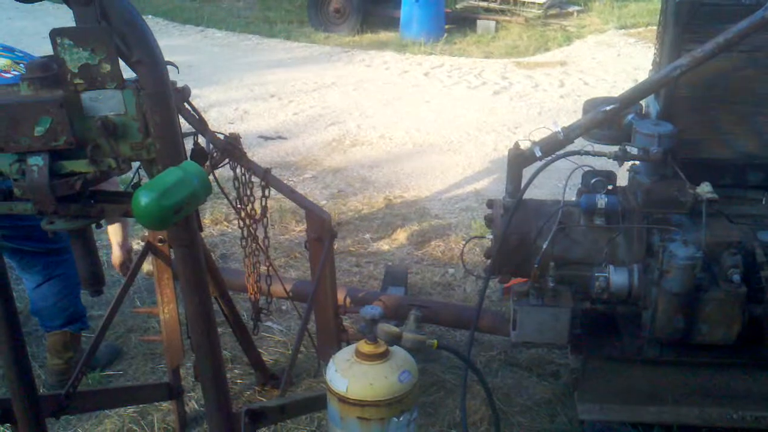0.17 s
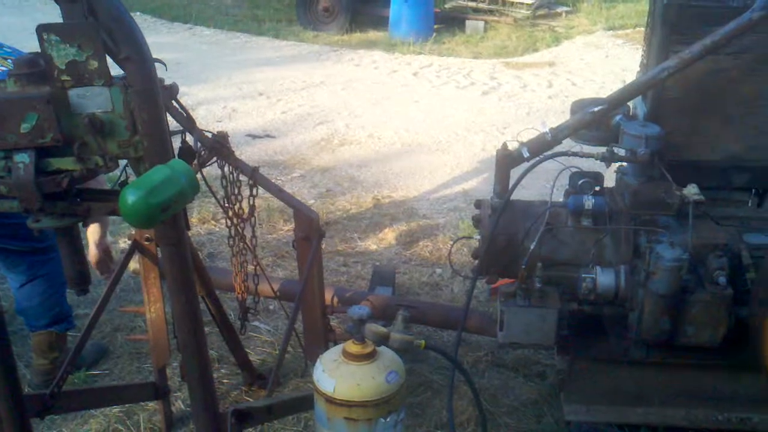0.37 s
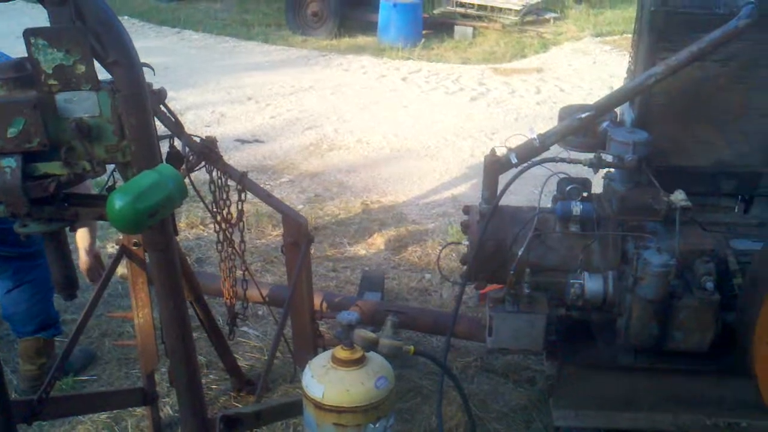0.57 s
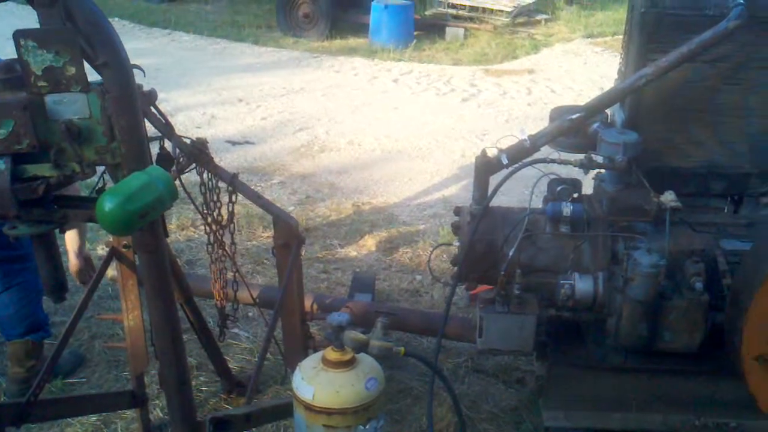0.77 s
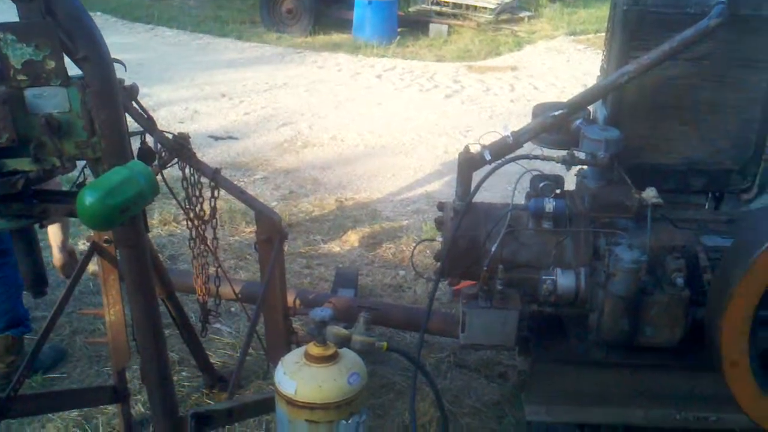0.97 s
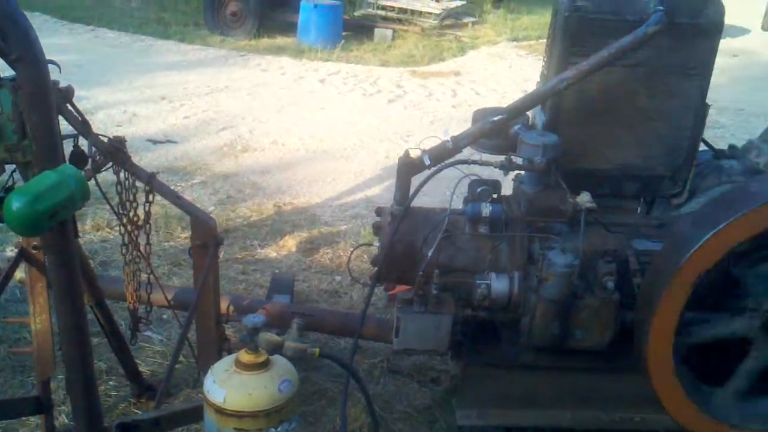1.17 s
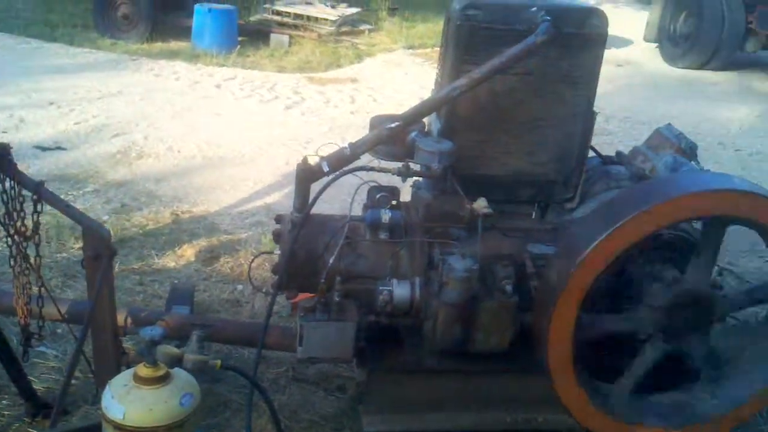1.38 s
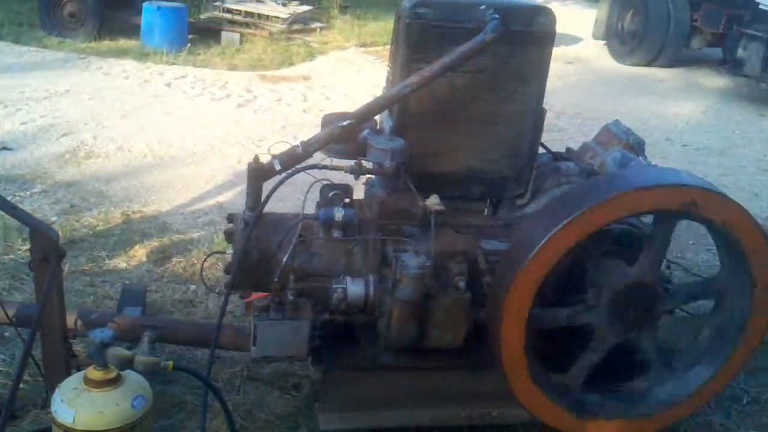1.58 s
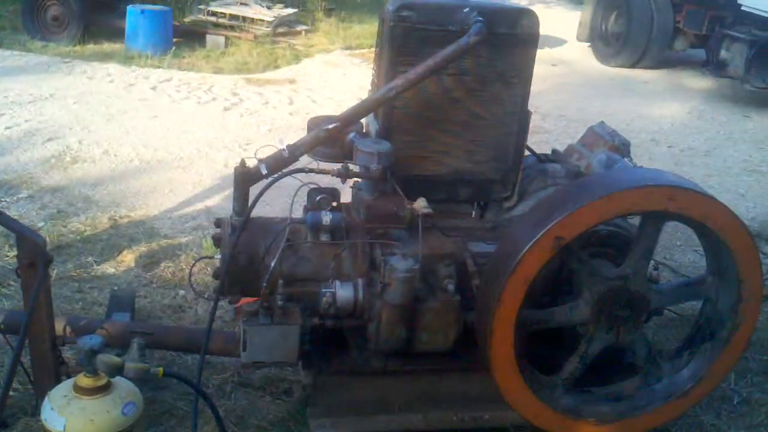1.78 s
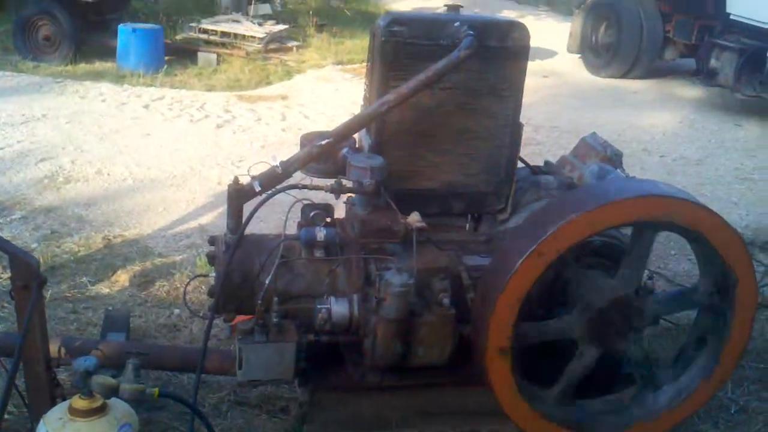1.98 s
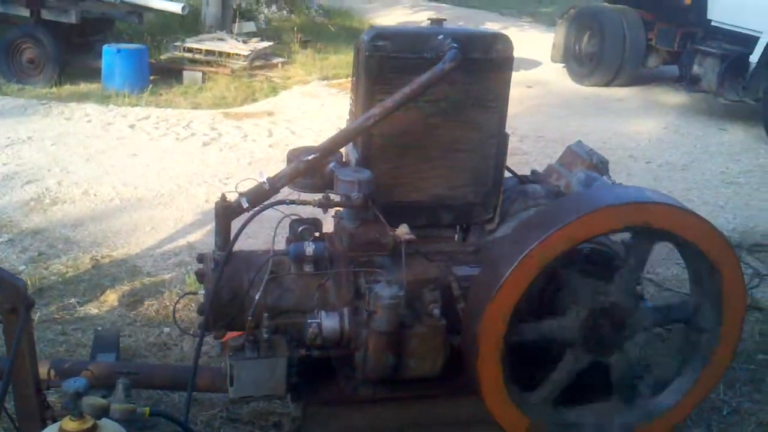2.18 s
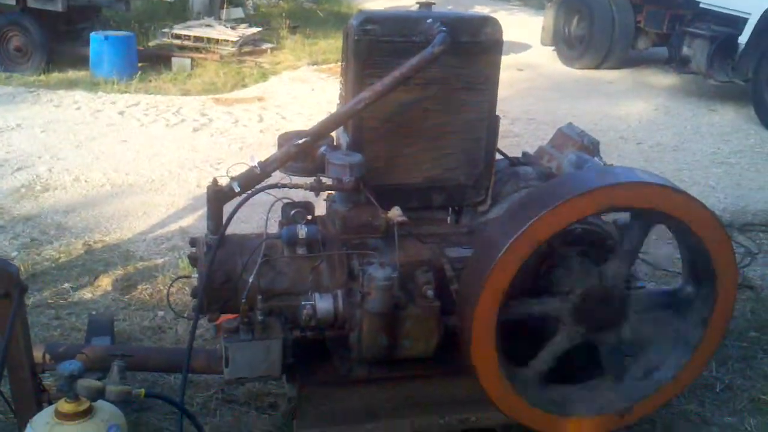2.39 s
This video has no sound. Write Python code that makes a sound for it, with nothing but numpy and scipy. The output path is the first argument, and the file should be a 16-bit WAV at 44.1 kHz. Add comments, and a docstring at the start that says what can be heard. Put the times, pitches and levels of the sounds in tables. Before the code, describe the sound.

A slow old stationary engine barks about once a second, chuffing and knocking in between.

```python
"""Hit-and-miss engine in a yard.

One old cylinder, about four cycles a second. Every fourth cycle fires: the exhaust barks, echoes in
its pipe and ends in a blast of gas. The cycles between only chuff and hiss. A mid-cycle knock and soft
rush of air leave the exhaust pipe droning. Hollow parts hum, running gear rumbles, the yard echoes."""
import sys
import numpy as np
from scipy import signal
from scipy.fft import rfft, irfft
from scipy.io import wavfile

SR = 44100
rng = np.random.default_rng(int(sys.argv[2]) if len(sys.argv) > 2 else 0)


def transcribe(signal):
    """Save signal, clipped to [-1, 1], as a 16-bit WAV file at the path in sys.argv[1]."""
    frames = np.atleast_2d(signal).T
    limited = np.clip(frames, -1, 1)
    pcm = np.round(limited * 32767).astype(np.int16)
    wavfile.write(sys.argv[1], SR, pcm)


N = 108045
FFT_SIZE = 2 ** 18
HZ = np.maximum(np.arange(FFT_SIZE // 2 + 1) * SR / FFT_SIZE, 1)
TIME_S = np.arange(N) / SR

# coasting exhausts (time [s], level [dB], bark [Hz], rush [dB])
CHUFFS = [(-.0425, -11.5, 1127, -0.5), (0.439, -26.5, 1220, -4.5), (0.677, -20.5, 1184, -4),
          (0.9174, -17.5, 1154, -2), (1.3929, -27.5, 1213, -3), (1.6309, -22, 1172, -5),
          (1.8705, -19, 1160, -3), (2.345, -25, 1225, -3.5)]
# mid-cycle knocks (time [s], level [dB], bark [Hz], rush [dB], drone [dB])
KNOCKS = [(0.0658, -25.5, 1143, 4, 1.5), (0.305, -34, 1240, -2.5, -1), (0.5417, -29.5, 1125, -4, -2),
          (.7810, -27, 1165, -1, -2), (1.0218, -27.5, 1146, 2, -2.5), (1.259, -37, 1164, -2.5, -1.5),
          (1.4960, -31, 1144, -1.5, -1), (1.7343, -29.5, 1203, 0, -2.5), (1.9745, -27.5, 1182, 0.5, -2),
          (2.2117, -35, 1170, -3, -3), (2.4470, -30.5, 1200, 4.5, -5.5)]
# fired exhausts (time [s], level [dB], bark [Hz], blast [dB], blast delay [s])
FIRINGS = [(0.204, -7, 1165, 0, 0.0267), (1.1582, -7.5, 1150, 1, 0.027), (2.1108, -9, 1152, -1, 0.0269)]
# pressure wave and its returns in the pipes (delay [s], bark [dB], thump [dB], thump [Hz])
CHUFF_ECHOES = [(0, -1, -13, 326), (.0052, -12.5, -14.5, 370), (.0115, -9, -17, 370),
                (0.0161, -9.5, -19, 335), (0.0233, -14, -9, 291), (0.0337, -40, -12, 300),
                (0.0432, -23, -14, 315), (0.052, -16, -32, 303)]
KNOCK_ECHOES = [(0, 0.5, -24.5, 320), (0.0106, -5.5, -16, 320), (0.0201, -15.5, -8, 365),
                (0.035, -24, -25, 370)]
FIRING_ECHOES = [(0, 2, -13, 303), (.0053, -4, -26, 350), (.0094, -2.5, -9.5, 340), (0.0153, 1, -4, 340),
                 (0.0214, -11, -8.5, 330), (0.0263, -2.5, -18, 349), (0.0365, -6, -29, 395)]
# noise spectra of gas flow and running gear (frequency [Hz], gain [dB])
CHUFF_SPECTRUM = [(30, -80), (70, -69.5), (110, -61), (200, -73.5), (300, -58.5), (500, -72), (750, -75.5),
                  (1200, -62.5), (1800, -87), (2450, -75), (3200, -85.5), (5000, -99), (14000, -107)]
HISS_SPECTRUM = [(1000, -105), (3000, -92), (4200, -103), (5600, -101), (8000, -103), (14000, -112)]
RUSH_SPECTRUM = [(70, -101), (140, -80.5), (320, -69), (520, -74), (750, -76), (1150, -67.5), (1700, -94),
                 (2400, -87), (3400, -95.5), (5500, -101), (14000, -108)]
ROAR_SPECTRUM = [(30, -65.5), (70, -61), (130, -42.5), (210, -53.5), (320, -41), (440, -51), (620, -48.5),
                 (820, -52.5), (1100, -44), (1600, -48), (2600, -53.5), (3100, -58.5), (5600, -95),
                 (14000, -100)]
CRACK_SPECTRUM = [(300, -51), (1500, -61), (2600, -55), (3100, -56.5), (3900, -60.5), (4500, -64),
                  (5500, -56.5), (6500, -62.5), (8000, -61.5), (10000, -69), (14000, -67.5)]
GEAR_SPECTRUM = [(25, -88), (60, -94), (130, -81.5), (200, -103), (290, -78), (500, -78.5), (750, -81.5),
                 (1150, -84.5), (1700, -82.5), (2500, -100), (3200, -100), (4100, -95), (5000, -103),
                 (8000, -107), (14000, -111)]
# brief hisses of gas (delay after chuff or knock [s], level [dB])
CHUFF_HISSES = [(.012, -30), (0.039, 7.5)]
KNOCK_HISSES = [(.002, -5), (0.084, 1)]
# air leaks (time [s], level [dB], whistle [Hz], width [Hz])
LEAKS = [(.182, -75.5, 5500, 350), (2.431, -79.5, 2600, 580), (2.435, -82, 3750, 890)]
# exhaust pipe resonances (frequency [Hz], width [Hz], boost [dB])
PIPE_MODES = [(318, 23, 2), (390, 41, 5), (526, 23, 9), (616, 14, 7), (819, 54, 12.5), (1023, 13, 3),
              (1067, 38, 5.5), (1460, 35, 5), (1870, 72, 6.5), (3290, 77, 3.5), (3932, 48, 9.5)]
# pipe air column (cool frequency [Hz], cool level [dB], hot level [dB], T60 [s])
AIR_COLUMN = [(138.3, -42.5, -52.5, .55), (238.3, -38, -32, 0.33), (319.6, -33, -44, 0.68),
              (402, -42, -57.5, 1), (512, -44.5, -51, 0.47), (604, -49.5, -55, 0.84), (798, -44, -69, 0.21)]
# modes of hollow parts (frequency [Hz], gain [dB], T60 [s])
HUM_MODES = [(291, -47.5, 0.15), (366.4, -61, 0.34), (470, -66, 0.7)]
# yard echo colour (frequency [Hz], gain [dB])
YARD_SPECTRUM = [(60, -28.5), (150, -19), (400, -11.5), (700, -12.5), (1150, -20.5), (2000, -15),
                 (4000, -11.5), (8000, -12.5), (14000, -14)]
# yard echo decay (frequency [Hz], T60 [s])
YARD_DECAY = [(100, 1), (400, 0.25), (1200, 0.24), (4000, 0.25), (14000, 0.3)]
# width of scattered sound (frequency [Hz], side over mid [dB])
SPREAD = [(50, -3.5), (150, 3), (350, -2.5), (1200, -14), (2600, 1), (4000, -2), (6000, -0.5),
          (14000, -3.5)]
# phase between microphone ports (frequency [Hz], right lag [rad])
PORT_PHASE = [(0, -2.2), (60, -1.9), (130, -1.2), (200, -.6), (260, .4), (340, .6), (520, .4), (600, .9),
              (700, -.1), (820, -.35), (1150, .05), (1450, -.15), (1600, .6), (1800, 2.1), (2100, 2.5),
              (2450, 3.1), (2850, 3.2), (3300, 5.5), (3950, 6.28), (4550, 6.7), (5250, 9.4), (6600, 12.6),
              (14000, 30.2)]
# port balance (frequency [Hz], left over right [dB])
PORT_BALANCE = [(30, 5), (60, 1.5), (150, 7), (320, -1), (700, 1.5), (1200, 1), (2500, -2.5), (8000, -0.4),
                (14000, 0)]


def from_db(db):
    """Decibels to gain."""
    return 10 ** (np.asarray(db) / 20)


def at_hz(points, hz):
    """Table lookup on a log-frequency axis."""
    knots_hz, values = np.transpose(points)
    return np.interp(np.log(hz), np.log(knots_hz), values)


def colour(x, spectrum):
    """Minimum-phase filter with the given spectrum."""
    cepstrum = irfft(np.log(from_db(at_hz(spectrum, HZ))))
    cepstrum[1:FFT_SIZE // 2] *= 2
    cepstrum[FFT_SIZE // 2 + 1:] = 0
    return irfft(rfft(x, FFT_SIZE) * np.exp(rfft(cepstrum)))[..., :N]


def resonate(x, hz, width_hz):
    """One resonance, unity gain at its peak."""
    return signal.lfilter(*signal.iirpeak(hz, hz / width_hz, SR), x)


def noise():
    """White noise, 0 dB per Hz."""
    return rng.standard_normal(N) * np.sqrt(SR / 2)


def diffuse():
    """Partly correlated stereo noise."""
    mid, side = noise(), colour(noise(), SPREAD)
    return mid + np.array([side, -side])


def add(track, start_s, sound):
    """Mix a sound in at start_s."""
    start = int(round(start_s * SR))
    first, end = max(start, 0), min(start + len(sound), N)
    if end > first:
        track[first:end] += sound[first - start:end - start]


def swell(events, rise_s, fall_s):
    """Envelope: exponential rise and fall about each (time [s], level [dB]), summed in power."""
    peaks = (from_db(db) * np.exp(-np.maximum((s - TIME_S) / rise_s, (TIME_S - s) / fall_s))
             for s, db in events)
    return np.sqrt(sum(peak ** 2 for peak in peaks))


def ragged(depth_db, rate_hz):
    """Quick random level swings, as in a turbulent jet."""
    swings = np.interp(TIME_S * rate_hz, np.arange(N), rng.standard_normal(N))
    return from_db(depth_db * np.clip(swings, -2, 2))


def burst(hz, width_hz):
    """Impulse response of a broad resonance, peak 1."""
    band_hz = [max(hz - width_hz / 2, 20), hz + width_hz / 2]
    sos = signal.butter(3, band_hz, "band", fs=SR, output="sos")
    wave = signal.sosfilt(sos, signal.unit_impulse(SR // 20))
    return wave / np.abs(wave).max()


def pipe_pulses(strokes, echoes, thump_follows):
    """A pressure wave and its returns each ring the pipe's bark, overtone and low thump."""
    out = np.zeros(N)
    overtone = from_db(-14.5) * burst(hz=2280, width_hz=820)
    mean_db = np.mean([row[1] for row in strokes])
    for s, db, bark_hz, *_ in strokes:
        bark = burst(bark_hz, width_hz=302) + overtone
        thump_base_db = mean_db + thump_follows * (db - mean_db)
        for delay_s, bark_db, thump_db, thump_hz in echoes:
            thump = from_db(thump_base_db + thump_db) * burst(thump_hz, width_hz=237)
            arrival_s = s + delay_s * (1 + 0.0087 * rng.standard_normal())
            add(out, arrival_s, -from_db(db + bark_db) * bark - thump)
    return out


def pipe(x):
    """Input plus the narrow exhaust pipe resonances it excites."""
    return x + sum((from_db(db) - 1) * resonate(x, hz, width_hz) for hz, width_hz, db in PIPE_MODES)


def running_gear():
    """Steady rumble and hiss of the moving parts."""
    return from_db(-3.5) * colour(diffuse(), GEAR_SPECTRUM)


def chuffs():
    """Unburnt air leaves with a soft knock and a puff."""
    flow = swell([(s + 0.029, db) for s, _, _, db in CHUFFS], rise_s=0.0094, fall_s=0.042)
    pulses = pipe_pulses(CHUFFS, CHUFF_ECHOES, thump_follows=0.25)
    return pulses + colour(noise() * flow, CHUFF_SPECTRUM)


def gas_hisses():
    """Gas hisses briefly at each chuff's peak, more faintly after each knock, and rings the pipe."""
    hisses, hiss_follows = [], 0.45
    for strokes, pattern in ((CHUFFS, CHUFF_HISSES), (KNOCKS, KNOCK_HISSES)):
        mean_db = np.mean([row[1] for row in strokes])
        hisses += [(s + delay_s, db + hiss_follows * (stroke_db - mean_db))
                   for s, stroke_db, *_ in strokes for delay_s, db in pattern]
    envelope = from_db(-3.5) * swell(hisses, rise_s=0.0026, fall_s=0.0073)
    jet = diffuse() * envelope * ragged(depth_db=6, rate_hz=350)
    return pipe(colour(jet, HISS_SPECTRUM))


def hum(drive):
    """Hollow parts ring on after each stroke."""
    out = np.zeros(N)
    for hz, db, t60_s in HUM_MODES:
        radius = from_db(-60 / (t60_s * SR))
        pole_real = radius * np.cos(2 * np.pi * hz / SR)
        out += from_db(db) * signal.lfilter([1, -pole_real], [1, -2 * pole_real, radius ** 2], drive)
    return out


def yard(source):
    """Scattered echoes off machines and sheds; the bass lasts longest."""
    scatter, tail = rfft(diffuse() / np.sqrt(SR / 2), FFT_SIZE), 0
    onset = 1 - np.exp(-(TIME_S / 0.012) ** 2)
    edges_hz = [1, 200, 600, 1800, 4000, 8000, SR / 2]
    for low_hz, high_hz in zip(edges_hz, edges_hz[1:]):
        t60_s = at_hz(YARD_DECAY, (low_hz + high_hz) / 2)
        decay = from_db(-60 * TIME_S / t60_s) * onset
        band = irfft(scatter * ((HZ >= low_hz) & (HZ < high_hz)))[:, :N]
        tail = tail + band * decay / np.sqrt(np.sum(decay ** 2))
    return colour(signal.fftconvolve(source[None], tail, axes=1)[:, :N], YARD_SPECTRUM)


def pipe_drones():
    """Each knock leaves the exhaust pipe's air column droning: sharp when hot, sinking as it cools."""
    hot_for_s, cooling_s, hot_sharpens = 0.099, 0.19, 0.1188
    lead_s, rise_s, damp_after_s = 0.009, 0.0058, 0.17
    gas_heat = sum((TIME_S > s) * np.exp(-np.maximum(TIME_S - s - hot_for_s, 0) / cooling_s)
                   for s, *_ in FIRINGS)
    envelope = (1 - np.exp(-TIME_S / rise_s)) / (1 + (TIME_S / damp_after_s) ** 4)
    out = np.zeros(N)
    for s, *_, drone_db in KNOCKS:
        start_s = s - lead_s
        heat = np.interp(start_s + TIME_S, TIME_S, gas_heat)
        warped_s = np.cumsum(1 + hot_sharpens * heat) / SR
        for hz, cool_db, hot_db, t60_s in AIR_COLUMN:
            level_db = drone_db + cool_db + (hot_db - cool_db) * heat[0] - 60 * TIME_S / t60_s
            add(out, start_s, np.sin(2 * np.pi * hz * warped_s) * from_db(level_db) * envelope)
    return out


def mid_cycle_knocks():
    """The exhaust valve closes: a knock in the pipe and a soft rush of air."""
    flow = swell([(s + 0.00044, db - 4) for s, _, _, db, _ in KNOCKS], rise_s=0.013, fall_s=0.1)
    pulses = pipe_pulses(KNOCKS, KNOCK_ECHOES, thump_follows=0.39)
    return pulses + colour(noise() * flow, RUSH_SPECTRUM)


def air_leaks():
    """Escaping air whistles briefly."""
    return sum(resonate(noise() * swell([(s, db)], rise_s=0.0052, fall_s=0.016), hz, width_hz)
               for s, db, hz, width_hz in LEAKS)


def firings():
    """A hard bark; hot gas then tears out of the pipe with a roar and a crack and hisses away."""
    blasts = [(s + delay_s, db) for s, _, _, db, delay_s in FIRINGS]
    roar = noise() * swell([(s - 0.002, db) for s, db in blasts], rise_s=0.0045, fall_s=0.0091)
    ages_s = [np.maximum(TIME_S - s, 0) for s, *_ in FIRINGS]
    outflow = sum((1 - np.exp(-age_s / 0.024)) * np.exp(-age_s / 0.025) for age_s in ages_s)
    crack_envelope = swell(blasts, rise_s=0.0043, fall_s=0.0063) + from_db(-7.5) * outflow
    crack = diffuse() * crack_envelope * ragged(depth_db=2, rate_hz=1500)
    gas = from_db(-1) * colour(roar, ROAR_SPECTRUM) + from_db(-3.5) * colour(crack, CRACK_SPECTRUM)
    barks = pipe_pulses(FIRINGS, FIRING_ECHOES, thump_follows=0.11)
    ring = from_db(-5.5) * (pipe(barks) - barks)
    return barks + ring + pipe(gas)


def scene():
    """Close engine plus yard echo, stereo."""
    fired, coasting, knocks = firings(), chuffs(), mid_cycle_knocks()
    ringing = hum(knocks + from_db(-3) * coasting + from_db(-4) * fired.mean(axis=0))
    engine = fired + coasting + knocks + gas_hisses() + air_leaks() + ringing
    return engine + pipe_drones() + yard(engine.mean(axis=0)) + running_gear()


def record(dry):
    """Two-port microphone: level and phase offsets, mid and side notches, low cut, clip, high cut."""
    low_cut_hz, high_cut_hz = 59, 14050
    mid_stop_hz, mid_notch_hz, side_stop_hz = [2370, 2840], 5200, [3680, 4230]
    lag_rad = np.interp(HZ, *np.transpose(PORT_PHASE))
    tilt = from_db(at_hz(PORT_BALANCE, HZ) / 2)
    left = irfft(rfft(dry[0], FFT_SIZE) * tilt)[:N]
    right = irfft(rfft(dry[1], FFT_SIZE) / tilt * np.exp(-1j * lag_rad))[:N]
    mid = signal.sosfilt(signal.butter(3, mid_stop_hz, "stop", fs=SR, output="sos"), (left + right) / 2)
    mid = signal.lfilter(*signal.iirnotch(mid_notch_hz, Q=16, fs=SR), mid)
    side_stop = signal.butter(2, side_stop_hz, "stop", fs=SR, output="sos")
    side = signal.sosfilt(side_stop, (left - right) / 2)
    low_cut = signal.butter(2, low_cut_hz, "high", fs=SR, output="sos")
    high_cut = signal.ellip(12, 0.2, 80, high_cut_hz, fs=SR, output="sos")
    stereo = signal.sosfilt(low_cut, [mid + side, mid - side])
    return signal.sosfilt(high_cut, np.clip(stereo, -1, 1))


dry = scene()
out = record(dry)
transcribe(out)
```